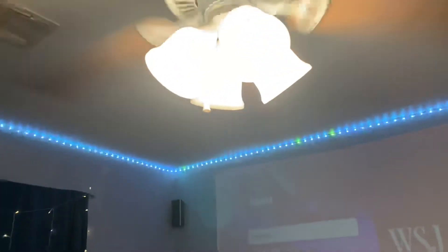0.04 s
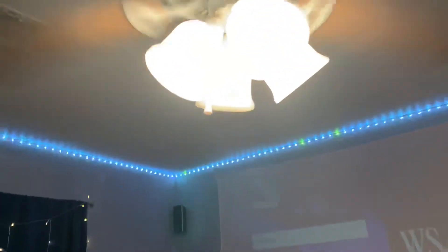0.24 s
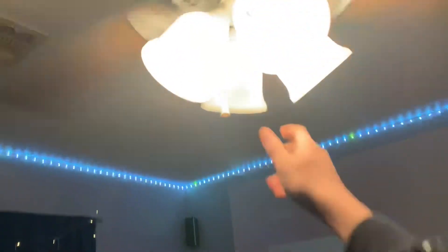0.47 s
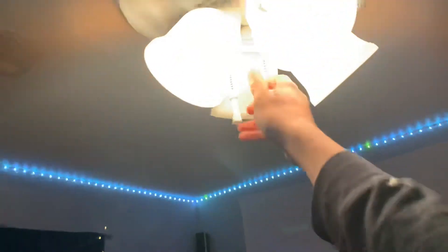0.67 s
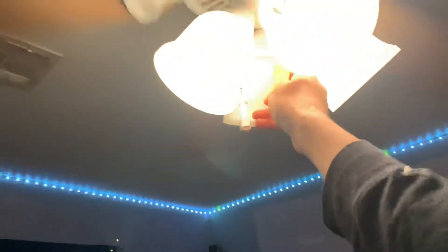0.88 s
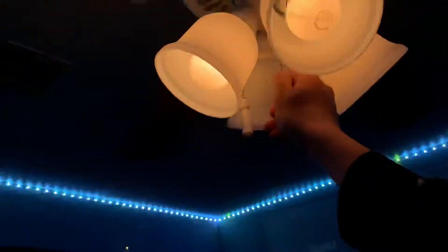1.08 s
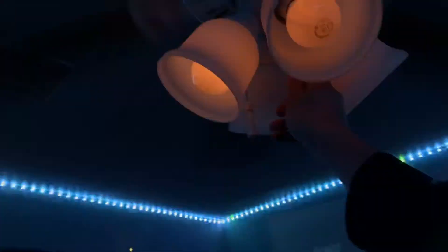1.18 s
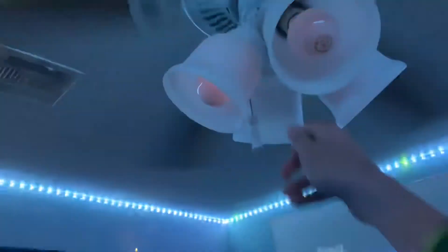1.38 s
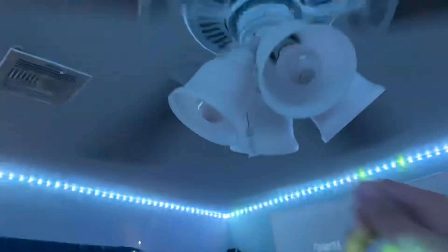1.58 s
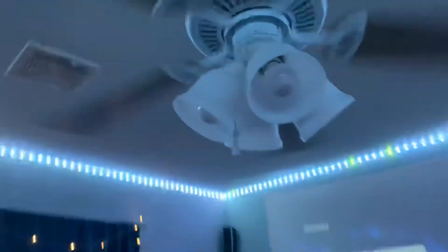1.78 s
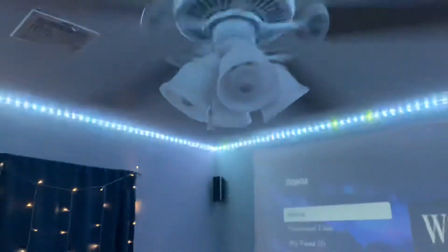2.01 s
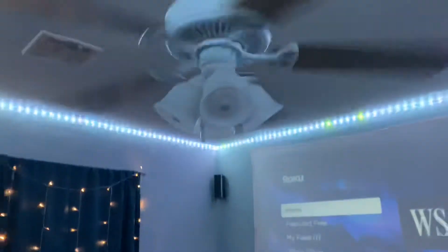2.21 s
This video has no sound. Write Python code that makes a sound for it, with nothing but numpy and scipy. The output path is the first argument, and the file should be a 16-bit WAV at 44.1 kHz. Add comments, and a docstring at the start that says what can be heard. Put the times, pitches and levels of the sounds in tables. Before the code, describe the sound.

A ceiling fan's pull chain switch snaps sharply at about 1.0 seconds and again at 1.1, ringing briefly in a small room. The bead chain rattles softly and ticks until about 1.5 seconds. The fan runs throughout with a soft rush of air, faint hiss and very faint motor whine. Its draught buffets the microphone with low, uneven rumbles and thumps from about 0.2 to 2 seconds.

```python
"""A soft rush of air and a low, gusty rumble: a ceiling fan runs in a small room, its downdraught
buffeting the microphone over a faint hiss and motor whine. About a second in, a hand pulls the
light's bead chain. The switch snaps on the pull and again as it springs back, ringing its metal
housing and the room. The slack chain ticks a few times afterwards."""
import sys
import numpy as np
from scipy import signal
from scipy.fft import rfft, irfft
from scipy.io import wavfile

SR = 44100
rng = np.random.default_rng(int(sys.argv[2]) if len(sys.argv) > 2 else 0)


def inscribe(sig):
    """Save sig as 16-bit PCM at rate SR to the path in sys.argv[1].

    A 1-D sig is mono; a 2-D sig holds one channel per row.
    Samples are clipped to [-1, 1] before scaling.
    """
    pcm = np.round(np.clip(np.atleast_2d(sig).T, -1, 1) * 32767)
    wavfile.write(sys.argv[1], SR, pcm.astype(np.int16))


N = 99225
TIME = np.arange(N) / SR
BAND_EDGES_HZ = np.geomspace(18, 17000, 31)

# Switch snaps, pull then release: start_s, level_db, contact_s, room_db
SNAPS = [(1.0243, -20.5, 0.00081, -8), (1.1357, -21.5, 0.001, -3)]
# Snap spectrum: freq_hz, pull_db, release_db
SNAP_SPECTRUM = [(300, -6.5, 1), (690, -1, 2.5), (960, -15, -7.5), (1330, 6.5, 7.5), (1800, -8.5, 1),
                 (2160, 7.5, 8.5), (2970, -1.5, -10.5), (3500, -11.5, 0.5), (4200, -28, -9.5),
                 (4910, 0.5, -2.5), (5600, 2.5, 0.5), (6550, -4.5, 0), (7500, -3.5, 1), (8440, 9, 8),
                 (9700, 6, 0), (10400, 1, 3.5), (11200, 14.5, 1), (12400, 5.5, -4), (13040, 0, 7),
                 (15320, 12.5, 14), (15700, 5.5, -1), (16000, -1, 6.5)]
# Switch and housing modes: pitch_hz, t60_s, pull_db, release_db, stereo_phase_rad
HOUSING_MODES = [(645, 0.05, -66, -41, .4), (881, 0.1, -59.5, -44.5, .5), (1201, 0.083, -40, -45, 0.74),
                 (1400, 0.081, -45, -57, 1.1), (1553, 0.042, -39.5, -34, 0.87),
                 (2042, 0.023, -52, -31.5, 1.21), (2166, 0.081, -49.5, -50, 1.2),
                 (2365, 0.17, -43.5, -43, .8), (2430, 0.043, -54, -64, 1.2), (2770, 0.17, -48, -46, 1.2),
                 (3050, .15, -59, -61.5, .8), (3290, .22, -58.5, -75, .8), (3386, 0.14, -57, -51, .8),
                 (3570, 0.06, -53, -52.5, 0.74), (4737, 0.28, -65, -52, 0.66),
                 (5475, 0.079, -48, -48, 0.69), (6530, 0.22, -52.5, -62, 0.88), (7140, .14, -60.5, -51, .8),
                 (8250, .03, -41.5, -20, 3), (9160, .035, -27, -56, 1.9), (11200, 0.091, -47.5, -44, .1),
                 (10800, 0.088, -46, -53, .2), (12800, .015, -27, -36, 2.4), (14030, .015, -21.5, -48, 1.9),
                 (14610, .04, -34, -33, 1.5), (14874, .1, -41, -41, 1), (15042, .1, -40, -36, .7)]
# Echoes off near surfaces: delay_s, gain_db
ECHOES = [(0.0112, -22.5), (.0148, -20)]
SNAP_T60_S = 0.022
REBOUND_LAG_S, REBOUND_DB = 0.0018, -6.5
KNOCK_LAG_S, KNOCK_DB, KNOCK_T60_S, KNOCK_TOP_HZ = 0.00056, -7.5, 0.05, 2800

def switch(room):
    """Each snap cracks, the latch rebounds once, and the housing knocks dully and rings."""
    lowpass = signal.butter(2, KNOCK_TOP_HZ, fs=SR, output="sos")
    out = 0
    for k, (start_s, level_db, contact_s, room_db) in enumerate(SNAPS):
        spectrum = np.array(SNAP_SPECTRUM)[:, [0, k + 1]]
        crack = from_db(level_db) * place(contact(spectrum, contact_s, SNAP_T60_S), start_s)
        rebound = contact(spectrum, contact_s, SNAP_T60_S)
        rebound = from_db(level_db + REBOUND_DB) * place(rebound, start_s + REBOUND_LAG_S)
        echoes = sum(from_db(gain_db) * place(crack, delay_s) for delay_s, gain_db in ECHOES)
        knock = signal.sosfilt(lowpass, contact(spectrum, contact_s, KNOCK_T60_S, size=4096))
        knock = from_db(level_db + KNOCK_DB) * place(knock, start_s + KNOCK_LAG_S)
        modes = sum(from_db(mode_db[k]) * ring(hz, t60_s, phase_rad)
                    for hz, t60_s, *mode_db, phase_rad in HOUSING_MODES)
        reverb = from_db(room_db) * reverberate(crack + rebound, room)
        out = out + crack + rebound + echoes + knock + place(modes, start_s) + reverb
    return out


# Bead strikes: start_s, level_db, ring_gain_db, pitch_hz
TICKS = [(0.976, -53.5, -12, 14800), (1.0014, -45.5, -15, 14500), (1.007, -57, -23, 11200),
         (1.2408, -46.5, 1, 11100), (1.3227, -53, -13, 14900), (1.3251, -55, 6.5, 2600),
         (1.3252, -48.5, -15, 14500), (1.338, -62.5, -5, 14700), (1.3415, -64, -6, 15200),
         (1.36, -76, -9, 14600), (1.3864, -55, -5.5, 14900), (1.392, -56, -6, 12100),
         (1.403, -67, -3, 14500), (1.405, -64, -10, 15100), (1.4339, -55.5, 1.5, 12120)]
# Bead strike spectrum: freq_hz, gain_db
TICK_SPECTRUM = [(1500, -8), (2600, 2.5), (4500, -9), (7000, -13.5), (9000, -7), (10500, -4.5),
                 (12100, -3.5), (13200, -7.5), (14800, 4.5), (16000, -10)]
TICK_CONTACT_S, TICK_T60_S, BEAD_T60_S, CHAIN_ROOM_DB = 0.00039, 0.011, 0.024, -8.5

def chain(room):
    """Beads tick against each other or the lamp and ring as the chain tightens and is let go."""
    out = 0
    for start_s, level_db, ring_gain_db, pitch_hz in TICKS:
        tick = place(contact(TICK_SPECTRUM, TICK_CONTACT_S, TICK_T60_S), start_s)
        bead = from_db(ring_gain_db) * place(ring(pitch_hz, BEAD_T60_S), start_s)
        out = out + from_db(level_db) * (tick + bead)
    out = out + chain_slide()
    return out + from_db(CHAIN_ROOM_DB) * reverberate(out, room)


# Sliding chain envelope: time_s, level_db
SLIDE_LEVEL = [(.96, -91), (.985, -76), (1.002, -67), (1.014, -52), (1.022, -48), (1.06, -52), (1.125, -63),
               (1.19, -54.5), (1.235, -57), (1.275, -73), (1.305, -83), (1.34, -73), (1.37, -84.5),
               (1.405, -74), (1.45, -81), (1.5, -99)]
TOUCHES_PER_S, TOUCH_SPREAD_DB, JINGLE_DB = 1100, 3.5, -5.5
BEAD_RANGE_HZ = (10050, 15300)

def chain_slide(bead_count=12):
    """The chain patters through the fingers; each random touch sets one bead ringing."""
    chance, polarity, bead_choice = rng.random((3, 1, N))
    strength = from_db(TOUCH_SPREAD_DB * np.minimum(rng.exponential(1, N), 3))
    touches = (chance < TOUCHES_PER_S / SR) * np.sign(polarity - 0.5) * strength
    patter = convolve(touches, contact(TICK_SPECTRUM, TICK_CONTACT_S, TICK_T60_S))
    struck_bead = (bead_choice * bead_count).astype(int)
    jingle = 0
    for k, hz in enumerate(np.linspace(*BEAD_RANGE_HZ, bead_count)):
        ringing = convolve(touches * (struck_bead == k), ring(hz, BEAD_T60_S, size=4096))
        jingle = jingle + from_db(at_hz(TICK_SPECTRUM, hz)) * ringing
    mix = unit_rms(patter) + from_db(JINGLE_DB) * unit_rms(jingle)
    return from_db(over_time(SLIDE_LEVEL)) * unit_rms(mix)


# Left-right likeness of metal contacts: freq_hz, likeness
CONTACT_LIKENESS = [(500, 0.89), (1500, -0.095), (2300, 0.21), (5500, 0.046), (7400, -0.21), (8500, -1.1),
                    (9300, -0.75), (10200, 1), (11100, 0.55), (12100, 0.11), (13200, -.85), (13900, -1.5),
                    (14600, -0.069), (15500, 0.79)]
ATTACK_S = 0.00042

def contact(spectrum, contact_s, t60_s, size=2048):
    """Metal parts clash for a moment, then the crack dies away."""
    t, hz = TIME[:size], bin_hz(size)
    envelope = np.minimum(t / ATTACK_S, 1) * decay(np.maximum(t - contact_s, 0), t60_s)
    burst = rng.standard_normal((2, size))
    for _ in range(3):  # flatten chance holes in the spectrum
        flat = np.exp(1j * np.angle(rfft(burst * envelope)))
        burst = irfft(flat, size) / np.sqrt(envelope + 1e-3)
    coloured = stereo(*flat, at_hz(CONTACT_LIKENESS, hz)) * from_db(at_hz(spectrum, hz))
    crack = irfft(coloured, size) * (t < t[-1] / 2)
    return unit_rms(crack) * np.sqrt(np.mean(envelope ** 2))


def ring(hz, t60_s, stereo_phase_rad=1, size=12000):
    """A struck mode, reaching the two sides out of step."""
    t = TIME[:size]
    phase = 2 * np.pi * (hz * t + rng.random()) + stereo_phase_rad * np.array([[0.5], [-0.5]])
    return np.sin(phase) * np.minimum(t / ATTACK_S, 1) * decay(t, t60_s)


# Draught strength at the microphone: time_s, level_db
DRAUGHT = [(0,-67.5), (.19,-55), (.235,-34), (.28,-46.5), (.335,-49), (.375,-35.5), (.415,-38.5), (.46,-31),
           (.52,-34.5), (.555,-29.5), (.6,-44), (.63,-37), (.71,-28), (.75,-35.5), (.86,-37), (.935,-48.5),
           (.99,-37.5), (1.07,-43), (1.13,-44), (1.2,-36), (1.33,-32), (1.395,-36), (1.44,-36),
           (1.54,-30.5), (1.615,-42), (1.66,-39), (1.75,-43.5), (1.8,-59), (1.86,-38.5), (1.91,-37),
           (1.97,-45), (2.05,-51.5), (2.25,-57)]
# Rumble spectrum at middling strength: freq_hz, gain_db
BUFFET_SPECTRUM = [(20, -25), (35, -5.5), (55, 1), (80, 3), (130, -8.5), (220, -16), (400, -30), (700, -42),
                   (1500, -67), (5000, -110)]
# Rumble width, narrowing to the centre: time_s, side_db
BUFFET_WIDTH = [(0, -2.5), (.88, -9), (1.0, -46.5)]
MIDDLING_DB, BRIGHTEN_FROM_HZ, BRIGHTEN_PER_OCTAVE = -35, 110, 0.44
EDDY_DB_PER_OCTAVE, FLUTTER_DB = 3.5, 2.5

def buffeting():
    """The draught rumbles on the microphone, brighter when stronger; eddies chop it into bumps."""
    gust_db = over_time(DRAUGHT) - MIDDLING_DB
    tilt_db_per_octave = BRIGHTEN_PER_OCTAVE * gust_db + EDDY_DB_PER_OCTAVE * drift(rate_hz=46)
    rumble = 0
    for hz, band in bands(noise(BUFFET_SPECTRUM, likeness=[(1, 0.00046)])):
        octaves = np.clip(np.log2(hz / BRIGHTEN_FROM_HZ), 0, 2)
        rumble = rumble + band * from_db(gust_db + octaves * tilt_db_per_octave)
    mid, side = rumble
    gain = from_db(MIDDLING_DB + FLUTTER_DB * drift(rate_hz=25))
    return gain * stereo(mid, side * from_db(over_time(BUFFET_WIDTH)))


# Single eddies: centre_s, level_db, pitch_hz
PUFFS = [(0.2465, -24.5, 81), (0.37, -25, 72), (.388, -33, 76), (.434, -31, 198), (0.465, -23, 139),
         (0.532, -25, 230), (0.532, -37, 500), (0.5483, -21.5, 110), (0.5492, -25.5, 308), (.627, -25, 85),
         (.6775, -38, 614), (.7105, -41.5, 600), (0.7127, -28, 196), (1.094, -24.5, 58.4),
         (1.181, -36, 645), (1.2943, -37.5, 565), (1.3482, -41.5, 750), (1.4302, -23, 199),
         (1.4403, -40.5, 610), (1.449, -23, 127), (1.481, -24, 133), (1.4938, -47, 560),
         (1.5292, -21, 119.3), (1.5410, -42.5, 590), (1.65, -30.5, 124), (1.885, -20.5, 73.8),
         (1.886, -34.5, 213), (1.918, -28.5, 65.1)]
PUFF_HALF_WIDTH_CYCLES = 0.62

def puffs():
    """Each eddy thumps or pops on the microphone as a brief pressure swing; small ones are quicker."""
    out = 0
    for centre_s, level_db, pitch_hz in PUFFS:
        cycles = (TIME - centre_s) * pitch_hz
        envelope = np.exp(-(cycles / PUFF_HALF_WIDTH_CYCLES) ** 2)
        out = out + from_db(level_db) * envelope * np.sin(2 * np.pi * cycles)
    return out


# Blade rush spectrum: freq_hz, gain_db
RUSH_SPECTRUM = [(25, -30.5), (60, -21), (110, -2.5), (160, -4.5), (205, 1), (280, -3), (380, -3.5),
                 (520, -12), (750, -14.5), (1000, -14.5), (1350, -13.5), (1800, -23), (2600, -26.5),
                 (4000, -41.5), (5500, -51.5)]
# Blade rush envelope: time_s, level_db
RUSH_LEVEL = [(0, -46), (.4, -46), (.9, -47), (1.5, -47), (2.25, -48.5)]
# Blade rush balance: freq_hz, left_minus_right_db
RUSH_BALANCE = [(200, -0.5), (400, 2.5), (700, 2.5), (1300, 4.5), (2400, 1), (4400, -1)]
# Left-right likeness of rush and hiss: freq_hz, likeness
AIR_LIKENESS = [(60, 1), (220, 1), (380, 0.78), (700, .3), (1250, -0.51), (2400, 0.13), (4400, 0),
                (15000, -0.096)]
# Hiss spectrum: freq_hz, gain_db
HISS_SPECTRUM = [(1000, -4.5), (1900, 11.5), (2600, 8), (3500, 4.5), (4600, -1.5), (5550, 2), (6100, -5.5),
                 (7000, -5.5), (9000, -21), (11000, -6), (13500, -21.5), (15000, -10), (16500, -19)]
# Hiss envelope: time_s, level_db
HISS_LEVEL = [(0, -67.5), (.18, -70), (.33, -65), (.55, -68), (.75, -72), (.95, -74), (1.3, -69.5),
              (1.55, -70), (1.72, -65.5), (1.9, -62), (2.1, -64.5), (2.25, -64.5)]
RUSH_WAVER_DB, RUSH_TOP_HZ = 1.44, 6000

def fan_air():
    """The blades push a steady rush of air; a faint hiss swells and sinks."""
    balance = from_db(at_hz(RUSH_BALANCE, bin_hz(N)) * [[0.5], [-0.5]])
    gain = from_db(over_time(RUSH_LEVEL) + RUSH_WAVER_DB * drift(rate_hz=10))
    rush = gain * irfft(rfft(noise(RUSH_SPECTRUM, AIR_LIKENESS)) * balance, N)
    rush = signal.sosfilt(signal.butter(2, RUSH_TOP_HZ, fs=SR, output="sos"), rush)
    hiss = from_db(over_time(HISS_LEVEL)) * noise(HISS_SPECTRUM, AIR_LIKENESS)
    return rush + hiss


# Motor tones: pitch_hz, level_db
MOTOR_TONES = [(976.5, -72.5), (1117, -71.5), (1394, -73.5), (2793, -83.5)]
WHINE_WAVER_DB = 3.5

def motor_whine():
    """The motor's faint tones, each wavering in level and phase."""
    out = 0
    for pitch_hz, level_db in MOTOR_TONES:
        amplitude = np.sqrt(2) * from_db(level_db + WHINE_WAVER_DB * drift(rate_hz=3.9))
        out = out + amplitude * np.sin(2 * np.pi * pitch_hz * TIME + drift(rate_hz=3.7))
    return out


# Room decay: freq_hz, t60_s
ROOM_T60 = [(300, 0.04), (2000, 0.34), (6000, 0.31), (11000, 0.14), (15000, 0.035)]
ROOM_GAP_S, ROOM_BUILD_S, ROOM_CLUMP_DB = 0.0028, 0.0075, -0.5
EARLY_DB, EARLY_T60_S = 2, 0.14

def room_response(size=22050):
    """Strong early reflections off ceiling and shades; the tail dies sooner in bass and treble."""
    t = TIME[:size]
    tail = 0
    for hz, band in bands(noise(spectrum=[(1, 0)], likeness=[(1, 0.0037)], size=size)):
        clumps = from_db(ROOM_CLUMP_DB * drift(rate_hz=110)[:size])  # reflections arrive unevenly
        tail = tail + band * decay(t, at_hz(ROOM_T60, hz)) * clumps
    onset = np.clip((t - ROOM_GAP_S) / ROOM_BUILD_S, 0, 1)
    early_boost = 1 + from_db(EARLY_DB) * decay(t, EARLY_T60_S)
    return unit_rms(tail * onset * early_boost) / np.sqrt(size)


def reverberate(x, room):
    """The room's answer to a sound, as wide as the sound itself."""
    mid_side = np.array([x[0] + x[1], x[0] - x[1]]) / 2
    return stereo(*convolve(mid_side, room))


def noise(spectrum, likeness, size=N):
    """Stereo noise of a given spectrum and left-right likeness; rms 1."""
    hz = bin_hz(size)
    mid, side = np.exp(2j * np.pi * rng.random((2, len(hz))))
    coloured = stereo(mid, side, at_hz(likeness, hz)) * from_db(at_hz(spectrum, hz))
    in_range = (hz > BAND_EDGES_HZ[0]) & (hz < BAND_EDGES_HZ[-1])
    return unit_rms(irfft(coloured * in_range, size))


def bands(x):
    """Yield (centre_hz, band): overlapping bands that sum to x."""
    size = x.shape[-1]
    spectrum = rfft(x)
    centres_hz = np.sqrt(BAND_EDGES_HZ[1:] * BAND_EDGES_HZ[:-1])
    for centre_hz, share in zip(centres_hz, np.eye(len(centres_hz))):
        weight = at_hz(np.c_[centres_hz, share], bin_hz(size))
        yield centre_hz, irfft(spectrum * weight, size)


def drift(rate_hz, hop=40, warmup=2000):
    """Slow random wander; rms 1."""
    pole = np.exp(-2 * np.pi * rate_hz * hop / SR)
    white = rng.standard_normal(N // hop + warmup + 2)
    slow = signal.lfilter([1], [1, -2 * pole, pole * pole], white)[warmup:]
    return np.interp(np.arange(N) / hop, np.arange(len(slow)), unit_rms(slow))


def stereo(mid, side, likeness=0):
    """Left and right from mid and side; likeness near 1 is mono, near -1 opposed."""
    likeness = np.clip(likeness, -0.99, 0.99)
    return np.sqrt(1 + likeness) * mid + np.sqrt(1 - likeness) * side * [[1], [-1]]


def place(x, start_s):
    """Delay a stereo sound and pad or cut it to scene length."""
    return np.pad(x, ((0, 0), (int(start_s * SR), N)))[:, :N]


def at_hz(points, hz):
    """Interpolate on a log-frequency axis."""
    points = np.array(points)
    return np.interp(np.log(hz + 1e-9), np.log(points[:, 0]), points[:, 1])


def over_time(points):
    """Interpolate at every sample."""
    return np.interp(TIME, *np.transpose(points))


def convolve(x, response):
    return signal.fftconvolve(x, response, axes=1)[:, :N]


def bin_hz(size):
    return np.arange(size // 2 + 1) * SR / size


def decay(t, t60_s):
    return from_db(-60 * t / t60_s)


def from_db(db):
    return 10 ** (np.asarray(db) / 20)


def unit_rms(x):
    return x / np.sqrt(np.mean(x ** 2) + 1e-20)


def scene():
    """Switch and chain in the room, under the running fan."""
    room = room_response()
    return switch(room) + chain(room) + buffeting() + puffs() + fan_air() + motor_whine()


def record(dry):
    """Steep low-pass at 15.8 kHz."""
    return signal.sosfilt(signal.ellip(10, 0.2, 80, 15800, fs=SR, output="sos"), dry)


dry = scene()
out = record(dry)
inscribe(out)
```